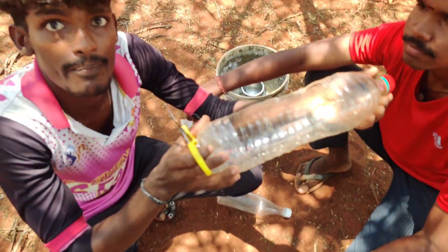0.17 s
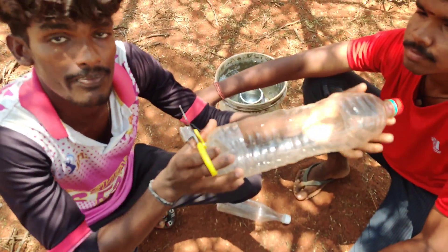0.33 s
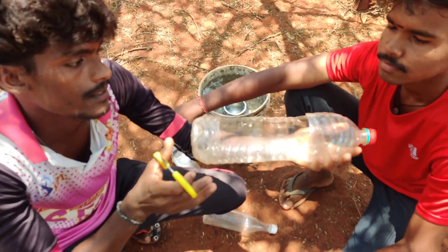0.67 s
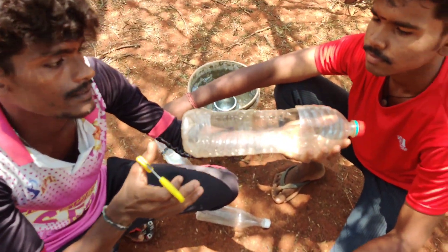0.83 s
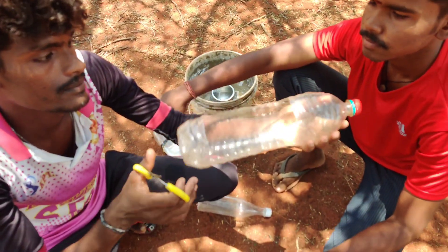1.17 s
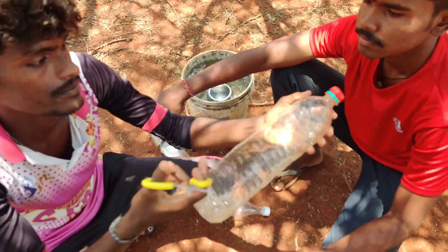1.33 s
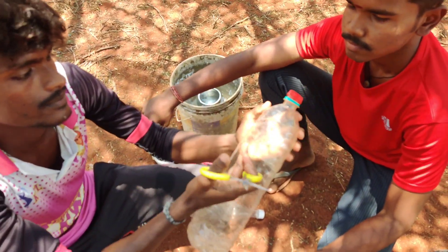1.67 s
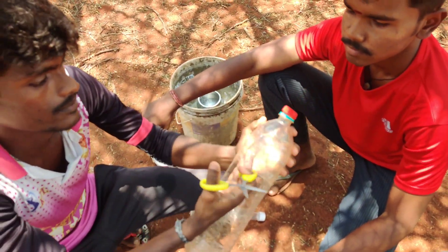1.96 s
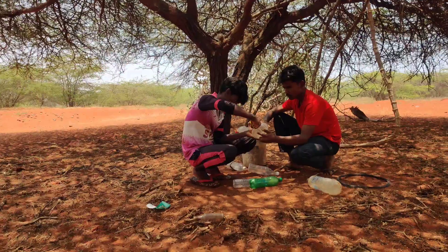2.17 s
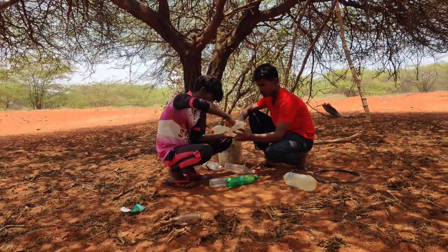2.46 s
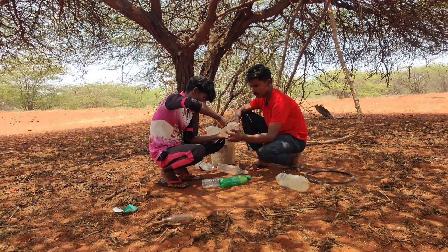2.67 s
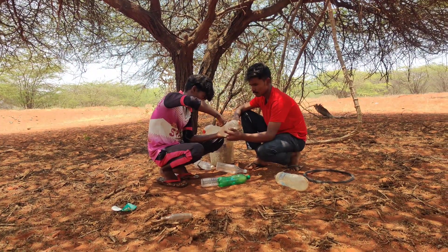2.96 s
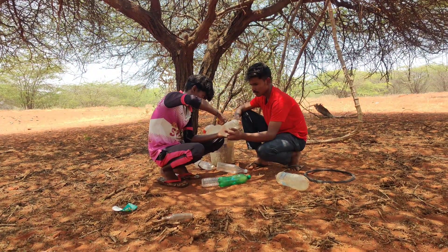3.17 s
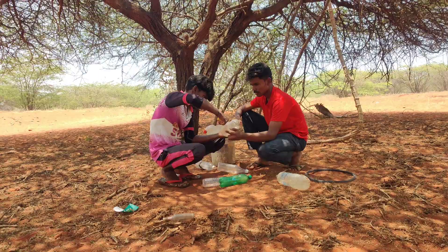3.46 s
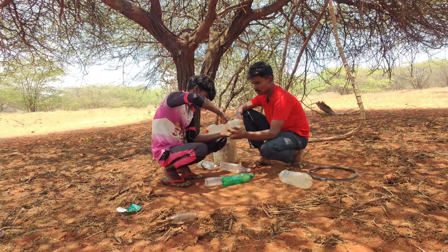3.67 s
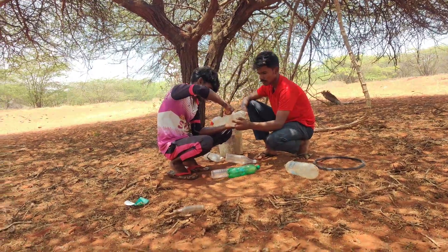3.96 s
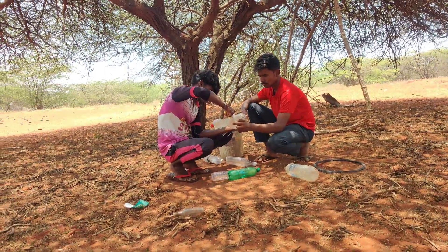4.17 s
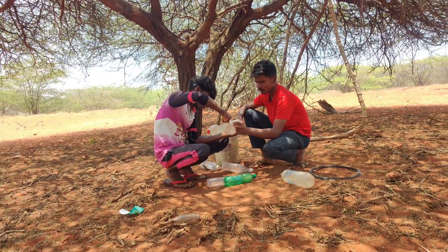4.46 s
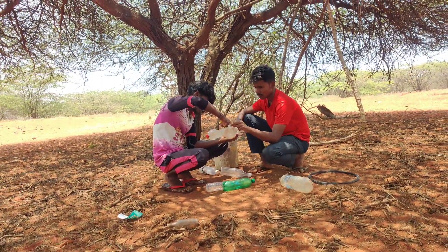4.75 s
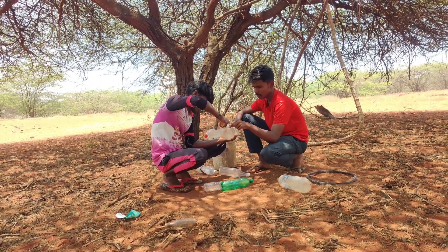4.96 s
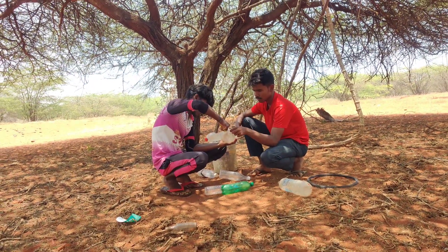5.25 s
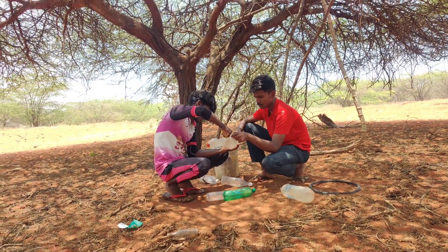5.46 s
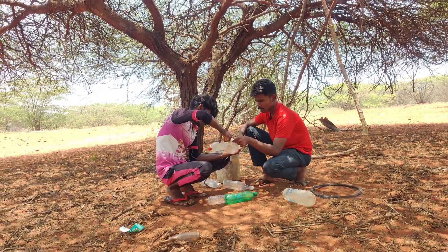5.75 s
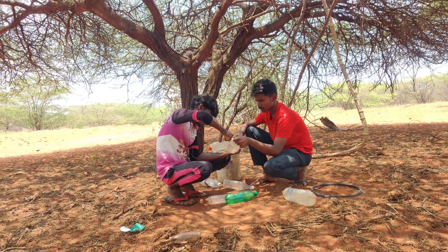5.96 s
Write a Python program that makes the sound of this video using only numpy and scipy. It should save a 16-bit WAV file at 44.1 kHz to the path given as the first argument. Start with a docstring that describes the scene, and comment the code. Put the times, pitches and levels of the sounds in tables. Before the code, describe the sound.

Outdoors under a tree, soft hiss, faint hum and distant falling bird whistles surround fingers lightly rubbing a thin bottle, with one small hollow bump. After two seconds a hard pop opens a louder stretch: scissors snip unevenly, blades slide and tick, and the plastic cracks sharply, strongest near the end. Wind rumbles on the close stereo microphone.

```python
"""Open-air hiss, a faint hum and wind come first, while fingers rub a thin plastic bottle under a tree.
The wind is low noise with lumpy single eddies; the fingers are stick-slip grains. Far birds whistle short glides.
Then scissors cut the bottle: each snip is a dense run of tiny fractures, and between snips the blades slide
in the slit and tick. The wall buckles with sharp cracks, which are noise bursts sent through its resonances."""
import sys
import numpy as np
from scipy import signal
from scipy.fft import rfft, irfft, next_fast_len
from scipy.io import wavfile

SR = 44100
rng = np.random.default_rng(int(sys.argv[2]) if len(sys.argv) > 2 else 0)


def digitize_waveform(pressure):
    """Quantize a signal to 16-bit integers and store it at the path in sys.argv[1].

    Rows of a 2-D input are taken as channels; values are limited to [-1, 1].
    """
    field = np.atleast_2d(pressure).T
    bounded = np.clip(field, -1, 1)
    quanta = np.round(bounded * 32767).astype(np.int16)
    wavfile.write(sys.argv[1], SR, quanta)


N = 269010
TIME = np.arange(N) / SR

# Levels in the tables are relative: each layer is trimmed where it is made.
# hiss of the open air: (time [s], level [dB])
AIR_LEVELS = [(0, -56), (.7, -61), (2.1, -61.5), (2.3, -57.5), (4, -57), (6.1, -56.5)]
# colour of the open air: (frequency [Hz], density [dB per Hz])
AIR_SPECTRUM = [(100, 15), (250, 10.5), (500, 3), (1000, -2), (2500, -6.5), (4300, -9.5), (7000, -15.5),
                (15000, -13.5)]
# wind on the microphone ports: (time [s], rumble [dB], buffeting [dB])
WIND_LEVELS = [(0.0, -60, -69.5), (2.11, -51.5, -63.5), (2.34, -46.5, -58), (2.79, -48, -57.5),
               (3.13, -45, -56.5), (3.18, -36, -43.5), (3.31, -44, -58), (3.77, -45.5, -53.5),
               (3.91, -48, -56), (5.13, -47, -49.5), (5.23, -38, -39.5), (5.52, -36, -40.5),
               (5.66, -53, -52.5), (5.69, -43, -41.5), (6.1, -42.5, -44.5)]
# colour of the deep rumble: (frequency [Hz], density [dB per Hz])
RUMBLE_SPECTRUM = [(8, -4), (22, -0.5), (50, -4), (80, -9.5), (130, -26.5), (300, -64)]
# colour of the buffeting: (frequency [Hz], density [dB per Hz])
BUFFET_SPECTRUM = [(40, -14.5), (85, -5), (150, -8), (300, -14), (600, -34), (1500, -47), (5000, -82)]
# fingers rub over the bottle, pressing harder or letting go:
# (time [s], length [s], level [dB], treble [dB], swell from start to end [dB])
FINGER_RUBS = [(0, .34, -55.5, -13, 2.5), (.34, 0.27, -64.5, 3.5, -3), (0.509, 0.14, -64, 12, 7),
               (1.646, 0.051, -51, -5.5, -11), (1.709, 0.071, -47, 1, 6), (1.796, 0.066, -50.5, -2, 7),
               (2.003, .052, -48, -5, -13), (2.061, 0.11, -53.5, 3, -4), (2.157, 0.015, -42, 0.5, 7),
               (2.183, .012, -48.5, 4, -3)]
# colour of fingers on plastic: (frequency [Hz], density [dB per Hz])
FINGER_SPECTRUM = [(200, -3.5), (330, 1), (470, 8.5), (750, 3), (1020, -6), (1400, -3), (1850, -10.5),
                   (2600, -6), (3400, -12), (4500, -10.5), (6200, -14.5), (7800, -26), (15000, -23.5)]
# the wall buckles with a crack, and the row at 4.339 s is the sharp attack of the scissors' clink: (time [s],
# level [dB], body: weight of the wall's middle resonances [dB])
WALL_CRACKS = [(0.169, -39.5, -2), (0.207, -35.5, -11.5), (2.53, -27.5, -11.5), (2.565, -16, -20),
               (2.994, -42, -13), (3.227, -28.5, -12), (3.249, -17.5, -23.5), (3.267, -20.5, -17.5),
               (3.502, -33.5, -15.5), (3.565, -33, 6), (3.606, -20, -15), (3.672, -28.5, -4),
               (3.814, -15, -12), (3.848, -22, -7), (3.935, -19, -8.5), (4.074, -34, 15),
               (4.256, -20.5, -9), (4.339, -33, -22.5), (4.549, -39, -27), (4.624, -20, -6.5),
               (4.65, -20, 0), (4.954, -29, -13), (5.276, -23, -12.5), (5.294, -15.5, -13.5),
               (5.349, -22, -15.5), (5.398, -15.5, -10), (5.473, -28.5, -4), (5.609, -17, -18),
               (5.732, -22.5, -17), (5.822, -29, -7), (5.834, -15.5, -21.5), (5.883, -23.5, -3),
               (5.899, -7.5, -19), (6.054, -11, -20), (6.085, -15.5, -18)]
# resonances of the bottle wall: (frequency [Hz], width [Hz], level [dB])
WALL_RESONANCES = [(230, 39, 0.5), (381, 85, -1), (746, 45, -2.5), (934, 166, -3), (1430, 200, 0.5),
                   (1930, 148, 1.5), (2210, 270, -1.5), (3070, 790, -2), (4170, 1220, -4.5),
                   (5520, 1020, -3), (10600, 5600, -19)]
# a hollow bump of the bottle, its modes: (frequency [Hz], level [dB], t60 [s])
BUMP_MODES = [(442, -35.5, 0.072), (385, -57, .05), (1300, -48, 0.023)]
# single calls of other far birds: (time [s], length [s], first pitch [Hz], last pitch [Hz], level [dB])
BIRD_CALLS = [(1.558, 0.032, 3100, 2820, -72), (1.92, 0.031, 3290, 2950, -68),
              (3.521, .035, 2320, 2330, -67), (3.689, 0.082, 2344, 2307, -63)]
# resonances of the snapping blades: (frequency [Hz], width [Hz], level [dB])
POP_RESONANCES = [(910, 1550, -3.5), (1780, 860, -2), (2900, 510, 2), (3360, 220, 5), (4520, 610, 6),
                  (6260, 1500, -10)]
# dry, dull clicks: (time [s], level [dB])
DULL_CLICKS = [(2.258, -29), (2.318, -30)]
# snips of the scissors: (time [s], length of the shearing [s], shearing [dB], slide that leads up to it [dB])
SCISSOR_SNIPS = [(2.54, 0.051, -41.5, -62), (3.212, 0.08, -39.5, -63), (3.6, 0.038, -40.5, -57),
                 (3.812, 0.025, -39.5, -58), (3.923, 0.031, -41, -48), (4.239, 0.066, -37.5, -62),
                 (4.644, 0.069, -40.5, -56), (4.953, 0.077, -43, -50), (5.105, 0.036, -37, -54),
                 (5.289, .04, -45, -48.5), (5.693, 0.029, -36, -57), (6.05, 0.076, -36.5, -55.5)]
# colour of blades sliding on plastic: (frequency [Hz], density [dB per Hz])
BLADE_SPECTRUM = [(300, -17), (620, -24), (800, -1), (1450, 3.5), (2500, -7.5), (3600, -9), (5700, -11.5),
                  (7500, -23), (10000, -18), (15000, -27)]
# colour of the crunching cut: (frequency [Hz], density [dB per Hz])
CRUNCH_SPECTRUM = [(150, -2), (300, 7), (620, -9.5), (760, -1), (1100, 4.5), (1450, 5), (1900, 0.5),
                   (2600, -5), (4000, -6.5), (5700, -8), (7500, -18.5), (10000, -15.5), (15000, -26)]
# a clink of the scissors, its modes: (frequency [Hz], level [dB], t60 [s])
CLINK_MODES = [(1540, -38.5, 0.041), (3160, -37, 0.03)]
# colour of the ringing tail: (frequency [Hz], density [dB per Hz])
TAIL_SPECTRUM = [(200, -19), (600, -5), (800, 0.5), (1500, -5), (3000, 1), (5500, -4.5), (7500, 2.5),
                 (10000, 5), (15000, 7.5)]
# the right port rings: (frequency [Hz], width [Hz], gain [dB])
PORT_RESONANCES = [(5650, 1660, 8), (9700, 780, 1)]

HUM_HZ, HUM_DB = 162, -67   # centre of the wavering pitch and level
# eddies: level in the strongest gust before chance; growth in dB per dB of buffeting
EDDIES_PER_S, EDDY_HZ, EDDY_DB, EDDY_GROWTH = 26.0, 90.0, -18, 1.64
CRACK_T60_S, BODY_DB_PER_DOUBLING = 0.014, 13   # decay at zero lifted body; more body lasts longer
BUMP_S, POP_S, POP_DB, CLINK_S = .208, 2.2245, -26.5, 4.338
# a far bird repeats a phrase of three falling notes, each lower and softer, with some chance in each
PHRASE_START_S, PHRASE_EVERY_S, NOTE_EVERY_S, NOTE_S = 0.62, .285, .097, .062
NOTE_HZ, NOTE_STEP_HZ, NOTE_FALL, NOTE_DB, NOTE_STEP_DB = 4540, 167, 0.106, -73, -3.7
# the blades rest after a snip, slide forward in the slit, and pause before the next
FIRST_SLIDE_S, REST_S, PAUSE_S = 2.25, .055, 0.013
TICKS_PER_S, TICK_OVER_SLIDE_DB, TICK_BODY_DB = 13, 12.5, -7   # sliding blades catch now and then
CUTOFF_HZ = 15800


def from_db(db):
    """Turn decibels into gain."""
    return 10 ** (np.asarray(db) / 20)


def rms_one(x):
    """Scale to rms 1."""
    return x / np.sqrt(np.mean(x ** 2) + 1e-20)


def in_time(rows):
    """Draw the columns of a curve at every sample."""
    s, *columns = np.transpose(rows)
    return [np.interp(TIME, s, column) for column in columns]


def add(track, s, sound):
    """Mix a sound into a track from time s on."""
    at = max(round(s * SR), 0)
    track[..., at:at + sound.shape[-1]] += sound[..., :max(N - at, 0)]


def colour(x, spectrum):
    """Give a noise its spectrum; rms 1."""
    hz, db = np.transpose(spectrum)
    length = x.shape[-1]
    size = next_fast_len(length)
    bins = np.maximum(np.fft.rfftfreq(size, 1 / SR), 1)
    gain = from_db(np.interp(np.log(bins), np.log(hz), db))
    return rms_one(irfft(rfft(x, size) * gain, size)[..., :length])


def resonance(x, hz, width):
    """Two-pole band-pass with gain 1 on top."""
    r = np.exp(-np.pi * width / SR)
    feedforward = np.array([1, 0, -1]) * (1 - r * r) / 2
    feedback = [1, -2 * r * np.cos(2 * np.pi * hz / SR), r * r]
    return signal.lfilter(feedforward, feedback, x + 1e-18)


def split_filter(x, order, hz, kind="low"):
    """Butterworth low-pass or high-pass."""
    return signal.sosfilt(signal.butter(order, hz, kind, fs=SR, output="sos"), x)


def drift(rate):
    """Slow chance of rms 1, with rate new values a second."""
    knots = rng.standard_normal(int(rate * N / SR) + 2)
    return rms_one(np.interp(TIME * rate, np.arange(len(knots)), knots))


def grains(per_s, spread_db):
    """Tiny slips at random moments with uneven sizes; rms 1."""
    sizes = from_db(spread_db * np.minimum(rng.exponential(1, N), 4))
    slips = rng.random(N) < per_s / SR
    return rms_one(slips * sizes * rng.choice([-1, 1], N))


def strokes(rows, shape):
    """Pressure builds and lets go, more abruptly the smaller shape is, and may swell on the way."""
    out = np.zeros(N)
    for s, length, db, swell_db in rows:
        size = max(int(length * SR), 3)
        pressure = np.hanning(size) ** shape * from_db(np.linspace(0, swell_db, size))
        add(out, s, from_db(db) * rms_one(pressure))
    return out


def friction(spectrum, per_s, spread_db, apart):
    """Stick-slip grains in stereo: a shared part and a scattered part for each side."""
    scattered = np.array([grains(per_s, spread_db) for side in range(2)])
    return colour(grains(per_s, spread_db) + apart * scattered, spectrum)


def open_air():
    """Soft hiss, partly shared by both sides, with a slowly changing level."""
    air_db, = in_time(AIR_LEVELS)
    hiss = rng.standard_normal((2, N)) + 0.46 * rng.standard_normal(N)
    return colour(hiss, AIR_SPECTRUM) * from_db(air_db)


def hum():
    """A faint sine whose pitch and level waver."""
    hz = HUM_HZ * (1 + 0.0108 * drift(10))
    return from_db(HUM_DB + 1.0 * drift(2.6)) * np.sin(2 * np.pi * np.cumsum(hz) / SR)


def wind(rumble_db=6.5, buffet_db=-2.5, buffet_pan_db=2.5):
    """Lumpy turbulent pressure, different at each port; the buffeting leans left."""
    low_db, high_db = in_time(WIND_LEVELS)
    sides = np.array([[.5], [-.5]])
    rumble = colour(rng.standard_normal((2, N)), RUMBLE_SPECTRUM) * from_db(low_db + rumble_db)
    high_db = high_db + buffet_db + buffet_pan_db * sides + 2.0 * drift(40)
    return rumble + colour(rng.standard_normal((2, N)), BUFFET_SPECTRUM) * from_db(high_db)


def eddies(left_db=-6.5, width_cycles=0.24, vary_db=2.0, vary_octaves=0.5):
    """Gusts shed eddies at an uneven pace, mostly on the right; each is one push and pull of pressure."""
    out = np.zeros(N)
    when, rumble_db, gust_db = np.transpose(WIND_LEVELS)
    for k, (late, size, pitch) in enumerate(rng.standard_normal((int(EDDIES_PER_S * N / SR), 3))):
        s = (k + 0.2996 * late) / EDDIES_PER_S
        hz = EDDY_HZ * 2 ** (vary_octaves * pitch)
        below_strongest = np.interp(s, when, gust_db) - gust_db.max()
        db = EDDY_DB + EDDY_GROWTH * below_strongest + vary_db * size
        cycles = TIME[:int(4 * SR / hz)] * hz - 2   # zero at the middle of the eddy
        push_pull = np.sin(2 * np.pi * cycles) * np.exp(-np.abs(cycles) / width_cycles)
        add(out, s - 2 / hz, from_db(db) * push_pull)
    return out * from_db([[left_db], [0]])


def finger_rubs(level_db=-5.5, split_hz=2300, treble_right_db=3.5):
    """Fingers catch and slip unevenly on the plastic; bass and treble follow their own pressure."""
    rub = friction(FINGER_SPECTRUM, per_s=2000, spread_db=0.5, apart=0.49) * from_db(2.0 * drift(120))
    dull = split_filter(rub, 2, split_hz)
    bright = split_filter(rub, 2, split_hz, "high") * from_db([[0], [treble_right_db]])
    dull_rows = [(s, length, db, swell) for s, length, db, treble, swell in FINGER_RUBS]
    bright_rows = [(s, length, db + treble, swell) for s, length, db, treble, swell in FINGER_RUBS]
    # subtracted so that the two bands meet in phase at the split
    return from_db(level_db) * (dull * strokes(dull_rows, 0.4) - bright * strokes(bright_rows, 0.2))


def buckle(t60, after_db, apart):
    """A stereo burst of separate fractures that dies quickly, then a weaker, slower settling."""
    t = TIME[:SR // 12]
    decay = from_db(-60 * t / t60) + from_db(after_db - 60 * t / (6.8 * t60))
    fractures = rng.standard_normal(len(t)) + apart * rng.standard_normal((2, len(t)))
    uneven = np.interp(t * 1000, np.arange(100), from_db(2.5 * rng.standard_normal(100)))   # a knot per ms
    return fractures * uneven * decay * (1 - np.exp(-t / 0.00061))


def wall(force, body_db, vary_db=2.58):
    """Each crack excites the wall's resonances a little differently; body_db lifts the middle ones."""
    out = 0
    chance = rng.standard_normal((len(WALL_RESONANCES), 2))
    for k, ((hz, width, db), (size, bend)) in enumerate(zip(WALL_RESONANCES, chance)):
        middle = 1 / (1 + (hz / 2800) ** 4) / (1 + (400 / hz) ** 2)
        bent_hz = hz * np.exp(.015 * bend)
        sign = (-1) ** (k + (hz > 600))   # the cavity and lowest panel mode cancel between their pitches
        gain = from_db(db + middle * body_db + vary_db * size)
        out = out + sign * gain * resonance(force, bent_hz, width)
    return out


def cracks(rows, level_db=11.5, body_lift_db=16.0, body_gain=1.4):
    """Each buckle rings the wall, longer when it has more body."""
    out = np.zeros((2, N))
    for s, db, body_db in rows:
        body_db = body_db + body_lift_db
        force = buckle(CRACK_T60_S * 2 ** (body_db / BODY_DB_PER_DOUBLING), after_db=-21.0, apart=0.31)
        snap = wall(force, body_gain * body_db)
        add(out, s, from_db(db + level_db) * rms_one(snap) / np.sqrt(snap.shape[1]))
    return out


def struck(s, modes):
    """One blow sets a few modes ringing."""
    out, t = np.zeros(N), TIME[:SR // 4]
    add(out, s, sum(from_db(db - 60 * t / t60) * np.sin(2 * np.pi * hz * t) for hz, db, t60 in modes))
    return out


def phrases(count=4, vary_s=.008, vary_hz=60):
    """The notes of the repeated phrase, never quite alike: rows like those of the single calls."""
    notes = []
    for phrase, note in np.ndindex(count, 3):
        late, sharp = rng.standard_normal(2)
        s = PHRASE_START_S + phrase * PHRASE_EVERY_S + note * NOTE_EVERY_S + vary_s * late
        hz = NOTE_HZ - note * NOTE_STEP_HZ + vary_hz * sharp
        notes.append((s, NOTE_S, hz, hz * (1 - NOTE_FALL), NOTE_DB + note * NOTE_STEP_DB))
    return notes


def birds(waver=0.0069):
    """Short whistled glides with a slightly unsteady pitch."""
    out, unsteady = np.zeros(N), drift(330)
    for s, length, first_hz, last_hz, db in phrases() + BIRD_CALLS:
        size, at = int(length * SR), int(s * SR)
        hz = np.linspace(first_hz, last_hz, size) * (1 + waver * unsteady[at:at + size])
        whistle = np.sin(2 * np.pi * np.cumsum(hz) / SR)
        add(out, s, from_db(db) * 2 * np.hanning(size) ** .5 * whistle)
    return out


def far_away(x, t60=0.31, direct_db=-4.0, scattered_db=-1.0):
    """A distant call arrives partly scattered by trees and ground."""
    t = TIME[:SR // 3]
    response = rng.standard_normal((2, len(t))) * from_db(-60 * t / t60)
    response /= np.linalg.norm(response[0])
    scattered = signal.fftconvolve(x[None], response, axes=1)[:, :N]
    return from_db(direct_db) * x + from_db(scattered_db) * scattered


def surge(s=2.161, rise_s=0.15, level_db=0.5):
    """A slow swell of pressure pushes the left side one way and lets it swing back."""
    age = np.maximum(TIME - s, 0) / rise_s
    swell = age ** 3.3 * np.exp(-1.7 * age)
    return from_db(level_db) * np.gradient(swell, 1 / (SR * rise_s)) * [[1], [0]]


def pop(pan_db=-8.5):
    """The scissors' blades snap shut hard and close, with a ring of their own."""
    out, force = np.zeros((2, N)), buckle(t60=0.021, after_db=-30.5, apart=0.11)
    snap = sum((-1) ** k * from_db(db) * resonance(force, hz, width)
               for k, (hz, width, db) in enumerate(POP_RESONANCES))
    snap = split_filter(snap, 4, 7000)
    snap /= snap[:, :SR // 200].std()   # level set by the first 5 ms
    add(out, POP_S, snap * from_db(POP_DB + pan_db * np.array([[.5], [-.5]])))
    return out


def slides():
    """The blades slide forward up to each snip: rows (time [s], length [s], level [dB])."""
    starts = [FIRST_SLIDE_S] + [s + length + REST_S for s, length, shear_db, slide_db in SCISSOR_SNIPS]
    return [(start, max(s - PAUSE_S - start, 0), slide_db)
            for start, (s, length, shear_db, slide_db) in zip(starts, SCISSOR_SNIPS)]


def blade_slides(level_db=-6.5, swell_db=1.5):
    """Sliding blades catch and slip unevenly along the slit."""
    pressure = strokes([(s, length, db, swell_db) for s, length, db in slides()], shape=0.2)
    rub = friction(BLADE_SPECTRUM, per_s=880, spread_db=1.0, apart=0.64)
    return from_db(level_db) * rub * pressure * from_db(2.0 * drift(70))


def ticks(vary_db=3.5, vary_body_db=7.0):
    """Small cracks at random moments of each slide, as strong as the blades press: rows like the cracks."""
    rows = []
    for s, length, db in slides():
        for tick in range(min(round(TICKS_PER_S * length), 16)):
            size, body = rng.standard_normal(2)
            tick_db = db + TICK_OVER_SLIDE_DB + vary_db * size
            rows.append((s + rng.random() * length, tick_db, TICK_BODY_DB + vary_body_db * body))
    return rows


def clicks(t60=0.036):
    """Two dull clicks on the left: each jumps one way and decays."""
    out, t = np.zeros((2, N)), TIME[:SR // 10]
    for s, db in DULL_CLICKS:
        add(out[0], s, -2 * from_db(db - 60 * t / t60))
    return out


def cutting(level_db=-4.0, swell_db=-3.0):
    """The closing blades tear the plastic in a dense run of tiny fractures."""
    rows = [(s, length, shear_db, swell_db) for s, length, shear_db, slide_db in SCISSOR_SNIPS]
    tearing = friction(CRUNCH_SPECTRUM, per_s=1300, spread_db=3.5, apart=0.51)
    return tearing * from_db(level_db + 2.0 * drift(200)) * strokes(rows, shape=0.085)


def ringing(x, t60=0.11, level_db=-1.0, far_t60=0.93, far_db=-32.0):
    """Dense modes of the bottle ring on, and ground and tree scatter a faint tail."""
    t = TIME[:SR // 2]
    decay = from_db(level_db - 60 * t / t60) + from_db(far_db + level_db - 60 * t / far_t60)
    decay *= 1 - np.exp(-t / 0.0014)
    response = colour(rng.standard_normal((2, len(t))), TAIL_SPECTRUM) * decay
    response /= np.sqrt(t60 * SR / np.log(1e6))
    return signal.fftconvolve(x, response, axes=1)[:, :N]


def through_ports(x):
    """The sides differ in level, and the right port adds its own resonances."""
    near = x * from_db([[.8], [-1.2]])
    near[1] += sum(from_db(db) * resonance(near[1], hz, width) for hz, width, db in PORT_RESONANCES)
    near[1] -= 2 * resonance(near[1], 14700, 5600)   # turns the phase of the highest treble
    return near


def scene():
    """The bottle and scissors, heard through two ports, in the open air."""
    bottle = finger_rubs() + cracks(WALL_CRACKS) + struck(BUMP_S, BUMP_MODES)
    bottle += blade_slides() + cracks(ticks()) + cutting() + struck(CLINK_S, CLINK_MODES)
    near = through_ports(bottle + ringing(bottle))
    surroundings = open_air() + hum() + wind() + eddies() + far_away(birds()) + surge()
    return near + pop() + clicks() + surroundings


def record(dry):
    """The top is cut steeply."""
    return signal.sosfilt(signal.ellip(10, .1, 70, CUTOFF_HZ, fs=SR, output="sos"), dry)


dry = scene()
out = record(dry)
digitize_waveform(out)
```